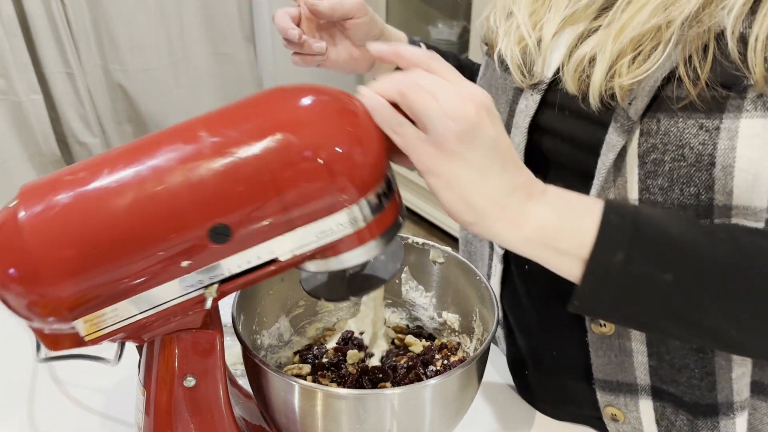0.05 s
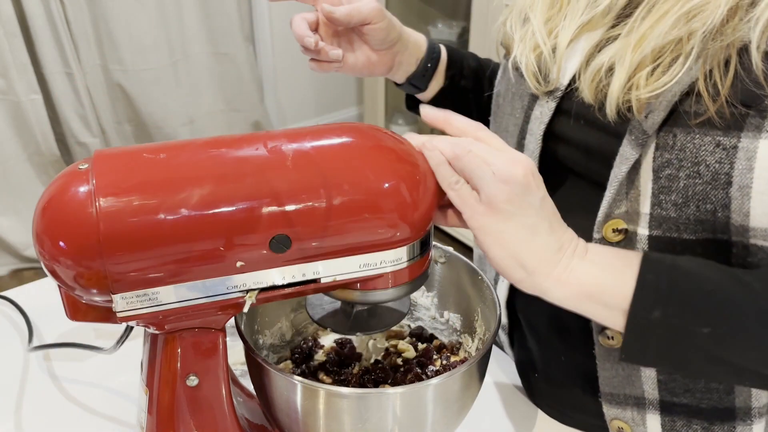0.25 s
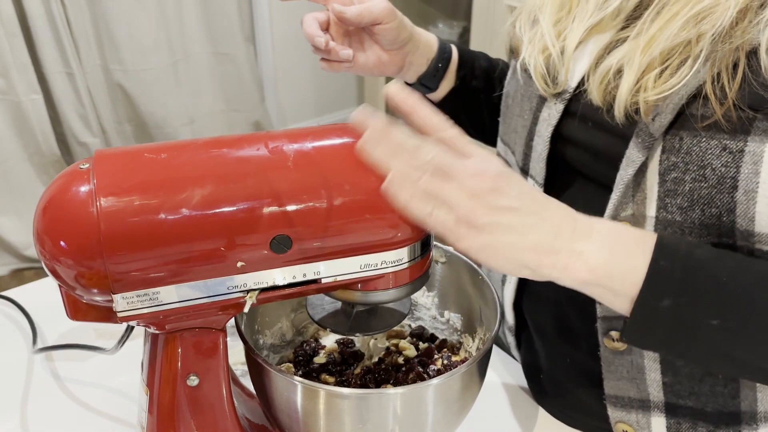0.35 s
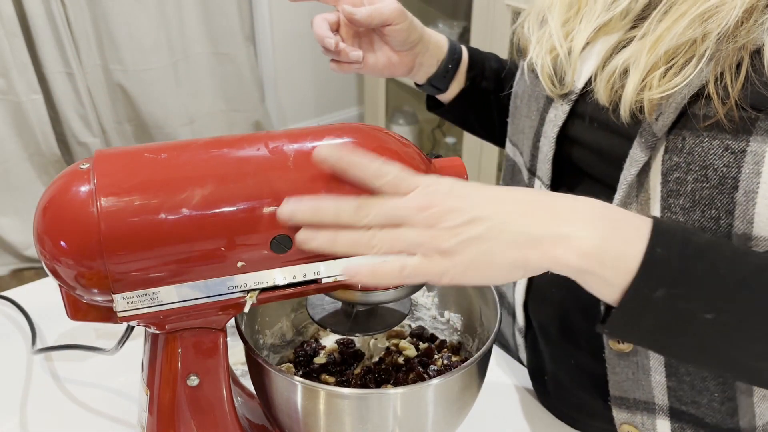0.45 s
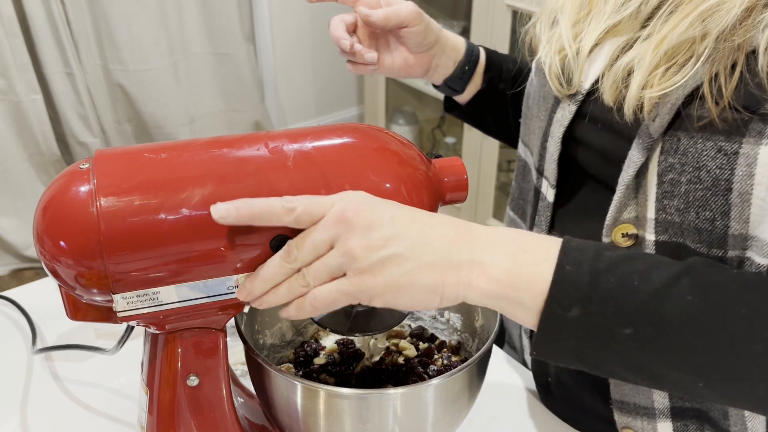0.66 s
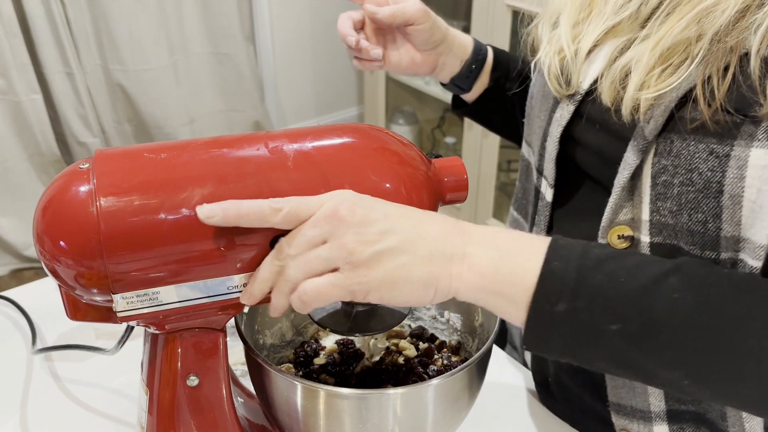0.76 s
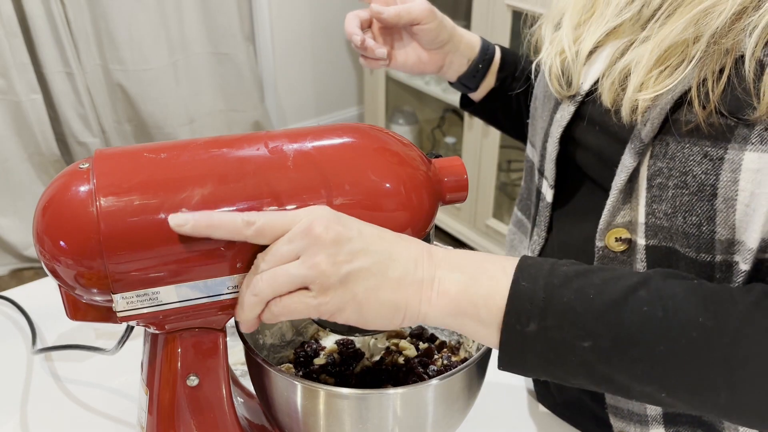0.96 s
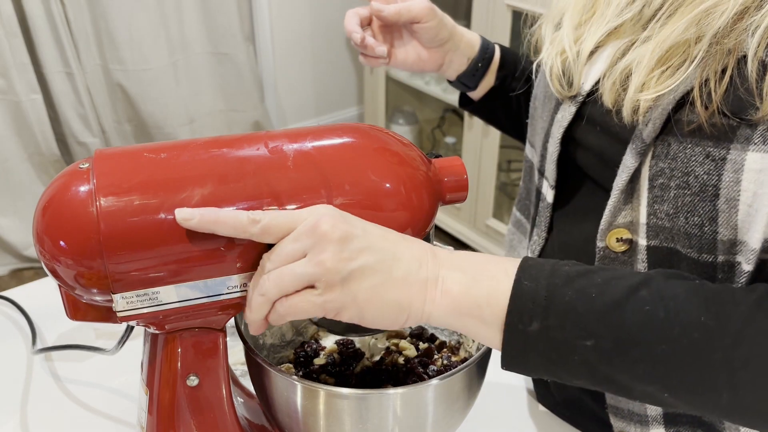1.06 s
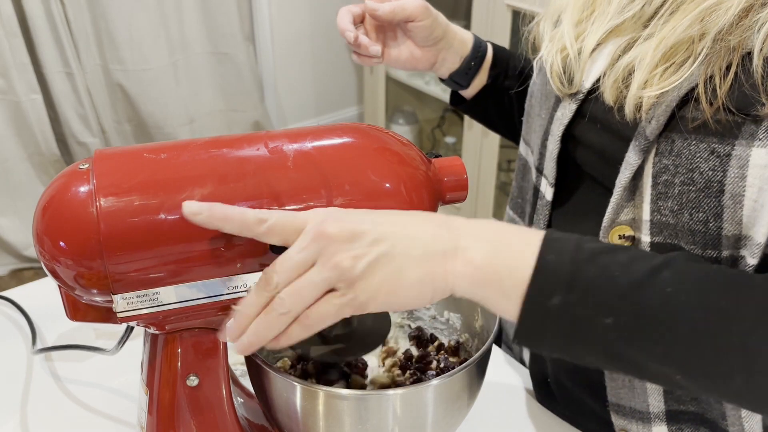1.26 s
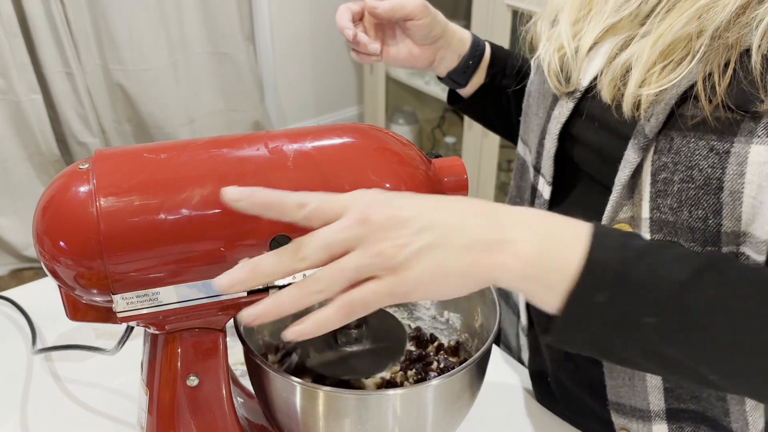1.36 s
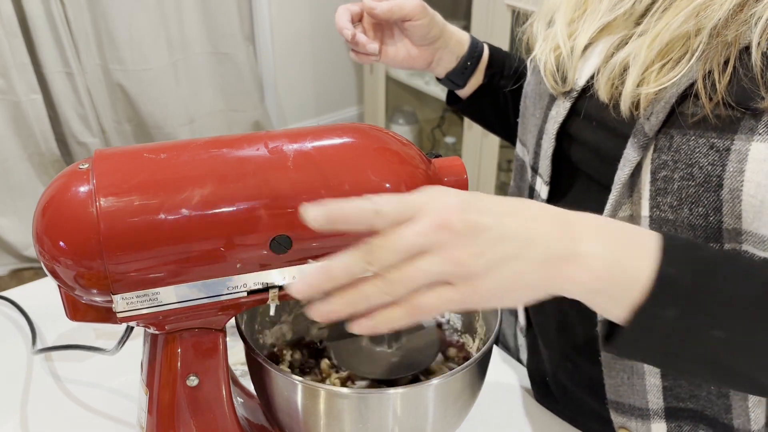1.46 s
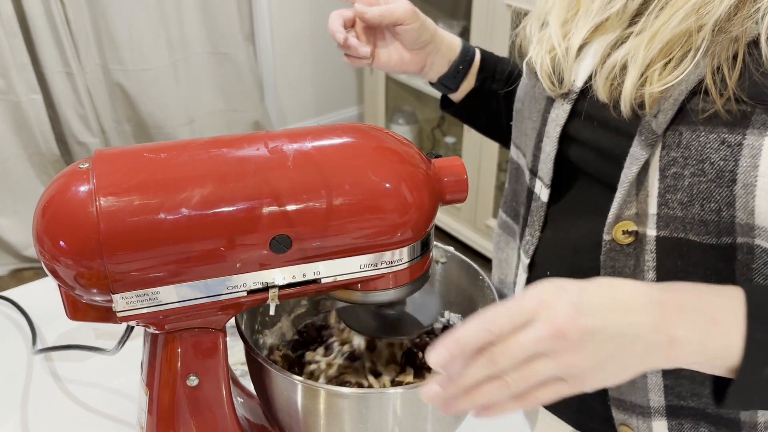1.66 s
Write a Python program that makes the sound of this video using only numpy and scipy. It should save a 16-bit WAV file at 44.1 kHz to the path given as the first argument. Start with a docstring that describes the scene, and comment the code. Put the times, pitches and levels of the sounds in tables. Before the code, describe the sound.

Stand mixer head thuds down with a loose rattle, lever clicks, and the motor whines steadily

```python
"""In a quiet kitchen, the head of a stand mixer drops onto its base with a dull thump and a rattle.
A hand rustles, feels for the lever and clicks it over; then the mains motor runs up.
Knocks and clicks are sums of fading tones; rattle, rustles and hiss are shaped noise.
The motor is a gear whine rippling with the mains, a buzzing casing, brush hiss and a low rumble.
"""
import sys
import numpy as np
from scipy import signal
from scipy.fft import rfft, irfft
from scipy.io import wavfile
from scipy.ndimage import uniform_filter1d

SR = 44100
rng = np.random.default_rng(int(sys.argv[2]) if len(sys.argv) > 2 else 0)


def rack_gain(trim_db):
    """Turn a fader trim in dB into the linear factor to multiply a signal by."""
    fader = np.asarray(trim_db, float)
    return 10 ** (fader / 20)


def inscribe(sig):
    """Save sig as 16-bit PCM at rate SR to the path in sys.argv[1].

    A 1-D sig is mono; a 2-D sig holds one channel per row.
    Samples are clipped to [-1, 1] before scaling.
    """
    pcm = np.round(np.clip(np.atleast_2d(sig).T, -1, 1) * 32767)
    wavfile.write(sys.argv[1], SR, pcm.astype(np.int16))


N = 74970  # length in samples

# room tone, shape of the spectrum: f/Hz, relative density/dB
KITCHEN_SPECTRUM = [(30, -26.5), (90, 4.5), (204, -11), (239, -0.5), (273, -12), (473, -13), (913, -20),
                    (1670, -22), (5040, -30), (16000, -35)]
# wavering appliance hum: f/Hz, width/Hz, level/dB
APPLIANCE_HUM = [(98, 65, -58), (173.8, 20, -61)]
# hand and sleeve rustles: t/s, length/s, level before the swell/dB, centre f/Hz
RUSTLES = [(0.032, 0.05, -60.5, 3500), (0.142, 0.13, -63, 1480), (0.439, 0.023, -64.5, 4800),
           (0.542, 0.035, -66, 10500), (0.575, 0.03, -68.5, 6330), (0.701, 0.026, -62, 3250),
           (0.728, 0.021, -65.5, 6000), (0.827, 0.033, -60, 6300), (0.955, 0.028, -66.5, 5170),
           (1.43, 0.048, -52.5, 12900)]
# head landing and rebounds: t/s, level/dB, contact length/ms, rattle level/dB
BLOWS = [(0.2292, -24, 0.19, -39.5), (0.2335, -15, 0.89, -27.5), (0.2513, -18, 5.53, -33),
         (0.2706, -19.5, 2.82, -37)]
# ringing of mixer body and worktop: f/Hz, level/dB, time to fall 60 dB/s
BODY_MODES = [(46.25, -4, 0.5), (60.74, -20, 0.99), (85.95, -2.5, 0.59), (120.4, -1, 0.56),
              (135, -4.5, 0.44), (191.4, -18, 0.57), (304, -9.5, 0.69), (350, -5.5, 0.21),
              (738, -9.5, 0.056), (930, -27, 0.033), (1006, -17, 0.17), (1577, -26, 0.066),
              (1828, -8.5, 0.076)]
# rattle of loose parts after each blow: f/Hz, level/dB, time to fall 60 dB/s
LOOSE_PARTS = [(323, -3.5, 0.61), (827, -9, 0.28), (1630, -9.5, 0.3), (3490, -12.5, 0.13),
               (6000, -20, 0.058), (9200, -13, 0.063)]
# single knocks and pings (hinge, head meets base, fingertip, lever spring, motor kick):
# t/s, f/Hz, level/dB, time to fall 60 dB/s
TAPS = [(.2295, 1073, -19.5, 0.053), (0.2331, 289, -5.5, 0.054), (1.047, 9480, -37, 0.086),
        (0.753, 444, -41, 0.054), (1.048, 350, -35.5, 0.21), (1.05, 731.4, -36.5, 0.26)]
# clicks: t/s, level/dB, treble tilt/(dB per octave); the first is the bright tick of the head's last rebound,
# the rest are latch, lever and bowl clicks
CLICKS = [(.2722, -42, 7.0), (1.0405, -47, 0), (1.047, -44, 3.0), (1.0535, -31, -6.0), (1.2792, -33, 0),
          (1.291, -29, 0), (1.2928, -32, -5.0), (1.2975, -33, 7.0), (1.3075, -41, 0), (1.3135, -38, -2.0)]
# steel parts that click: f/Hz, level/dB, time to fall 60 dB/s
STEEL_MODES = [(3800, -17, .012), (4700, 0, .01), (5400, -1, .009), (7400, -2, .009), (8100, -3, .011),
               (9500, -17, .02)]
# motor loudness over time: t/s, whine/dB (before a fixed cut), buzz/dB, hiss/dB, rumble/dB
MOTOR_LEVELS = [(1.043, -45, -41.5, -35.5, -63), (1.078, -43, -38, -51.5, -37.5),
                (1.14, -46.5, -41, -54, -56.5), (1.22, -39.5, -45, -49, -52), (1.29, -38.5, -42, -49, -48),
                (1.42, -41, -43.5, -49, -51), (1.509, -39, -44.5, -45.5, -40.5),
                (1.543, -47.5, -44, -47.5, -48), (1.60, -41.5, -46, -46, -43),
                (1.70, -50.5, -39.5, -47, -50)]
# mesh tone and its mains sidebands, ripple steps -2 to +2: level/dB
MESH_DB = [-6, -3, 0, -2, -1]
# octave of the mesh tone, ripple steps -2 to +1: level/dB
OCTAVE_DB = [-12, -6, -9, -13]
# casing resonances that colour the whine: f/Hz, width/Hz, level/dB
WHINE_CASING = [(1422, 124, 2.5), (1609, 60, 6), (1944, 120, 7), (3230, 1500, -15.5)]
# casing resonances that buzz: f/Hz, width/Hz, level/dB
BUZZ_CASING = [(226, 66, -7), (334, 153, -2.5), (610, 79, -3.5), (721, 62, -2.5), (860, 146, -1),
               (1030, 165, -3.5), (1676, 310, -3.5)]
# brush hiss, shape of the spectrum: f/Hz, relative density/dB
HISS_SPECTRUM = [(1200, -10), (2200, -12.5), (3300, -12.5), (5400, -15.5), (10000, -17.5), (12200, -15.5),
                 (15800, -30.5)]
# the stand shakes the worktop: f/Hz, width/Hz, level/dB
RUMBLE = [(56, 52, -10.5), (99.2, 27, -0.3)]
# two microphone ports, how far the left one leads: f/Hz, phase/rad
PORTS = [(60, 0), (700, .8), (2800, 1), (6300, -.8), (7200, -4.8), (8400, -6.1), (9500, -6.5),
         (11700, -9.1), (12800, -9.7), (14500, -12.3), (15900, -12.6)]

KITCHEN_DB = -56
RISE_CYCLES = 0.28  # heavy parts take up the blow slowly
SHUDDER_DB, SHUDDER_RATE = 2.5, 30  # chance level changes of each body tone: dB, times a second
CRACK_DB, CRACK_T60_S = 9, 0.036  # the first instant of each rattle is louder
RUN_UP_START_S, RUN_UP_END_S, EASE = 1.045, 1.455, 1.35
START_HZ, TOP_MESH_HZ, SAG_HZ_PER_S = 780, 1684, 55
SWITCH_S = 0.007  # time the motor takes to fade in
RIPPLE_HZ = 120
WAVER_DB, WAVER_RATE = 3.0, 22  # chance level changes of the whine: dB, times a second
BUZZ_NOISE, PULSE_SCATTER_DB = 1.34, 5.5
GATE = 0.083  # depth of the mains ripple, as a share of the mean
ROOM_T60_S, ROOM_BASS_HZ, ROOM_DB = 0.4, 350, -8
ROOM_WIDTH = 1.86  # unshared part of the tail, in the mids
PAN_DB, WIDE_HZ = 1.5, 1300
MIC_LOW_HZ, TOP_HZ = 33, 15900
LEFT_RIGHT = np.array([[1], [-1]])  # plus on the left, minus on the right


def level(x, db):
    """Scales a sound to an average (rms) level in dB."""
    return x * rack_gain(db) / np.sqrt(np.mean(x ** 2) + 1e-20)


def band(x, hz, width_hz):
    """Two-pole resonance, gain 1 at the centre."""
    return signal.lfilter(*signal.iirpeak(min(hz, .45 * SR), hz / width_hz, fs=SR), x)


def narrow_noise(length, hz, width_hz, db):
    """Noise through the same resonance twice: a wavering, blurred tone."""
    noise = rng.standard_normal(length)
    return level(band(band(noise, hz, width_hz), hz, width_hz), db)


def colour(points):
    """Noise with a spectrum drawn through (f/Hz, dB) points."""
    hz, db = np.array(points).T
    f = np.arange(N // 2 + 1) * SR / N + 1  # the 1 avoids the logarithm of zero
    gain = rack_gain(np.interp(np.log(f), np.log(hz), db, right=-120))
    return irfft(rfft(rng.standard_normal(N)) * gain, N)


def walk(rate):
    """Smooth chance, spread 1, turning about rate times a second."""
    k = int(SR / rate)
    smooth = uniform_filter1d(uniform_filter1d(rng.standard_normal(N), k), k)
    return level(smooth, 0)


def ring(modes, tilt_db=0):
    """A struck object: a sum of fading tones, tilted in dB per octave around 6 kHz."""
    t = np.arange(SR) / SR
    out = np.zeros(SR)
    for hz, db, t60 in modes:
        strength = rack_gain(db + tilt_db * np.log2(hz / 6000))
        out += strength * np.sin(2 * np.pi * hz * t) * rack_gain(-60 * t / t60)
    return out


def add(out, s, x):
    """Lays a sound into the mix, starting at s seconds."""
    i = int(s * SR)
    out[i:i + len(x)] += x[:N - i]


def kitchen():
    """Room tone and appliance hum from filtered noise; the bass is alike left and right."""
    mid = colour(KITCHEN_SPECTRUM)
    side = band(colour(KITCHEN_SPECTRUM), WIDE_HZ, 5500)
    hum = sum(narrow_noise(N, hz, width, db) for hz, width, db in APPLIANCE_HUM)
    drift = rack_gain(walk(0.73))  # about 1 dB up and down
    return hum + level(mid + 0.87 * side * LEFT_RIGHT, KITCHEN_DB) * drift


def rustles():
    """Cloth and skin slide in grains: noise in uneven short steps that swells and fades."""
    out = np.zeros(N)
    for s, length, db, hz in RUSTLES:
        t = np.arange(SR // 5) / SR / length  # time in rustle lengths
        noise = rng.standard_normal(len(t))
        grain_gain = rack_gain(2.6 * rng.standard_normal(len(t) // 60 + 1)).repeat(60)[:len(t)]
        swell = 5 * t * np.exp(1 - 3.16 * t)
        add(out, s - 0.08 * length, level(band(noise * grain_gain, hz, 0.96 * hz), db) * swell)
    return out


def mixer_body():
    """Body and worktop tones that build up over part of a cycle and shudder as they fade."""
    t = np.arange(SR) / SR
    out = np.zeros(SR)
    for mode in BODY_MODES:
        rise = 1 - np.exp(-t * mode[0] / RISE_CYCLES)
        out += ring([mode]) * rise * rack_gain(SHUDDER_DB * walk(SHUDDER_RATE)[:SR])
    return out


def rattle():
    """Loose parts jangle as fading bands of noise, with a crack at the start."""
    t = np.arange(SR) / SR
    shake = np.zeros(SR)
    for hz, db, t60 in LOOSE_PARTS:
        noise = band(band(rng.standard_normal(SR), hz, hz / 2), hz, hz)
        shake += level(noise, db) * rack_gain(-60 * t / t60)
    crack = 1 + rack_gain(CRACK_DB - 60 * t / CRACK_T60_S)
    return shake * rack_gain(0.56 * walk(170.0)[:SR]) * crack


def thump():
    """Each blow pushes the body tones for its contact time and shakes loose parts."""
    out, t = np.zeros(N), np.arange(SR) / SR
    body = mixer_body()
    for s, db, contact_ms, rattle_db in BLOWS:
        push = np.hanning(int(contact_ms * SR / 1000) + 3)
        knock = signal.fftconvolve(body, push / push.sum())[:SR]
        fade_in = np.clip(t * 1000 / contact_ms, 0, 1)
        add(out, s, rack_gain(db) * knock + rack_gain(rattle_db) * rattle() * fade_in)
    return out


def taps():
    """Each knock or ping is one fading tone, pushed for about half its cycle."""
    out = np.zeros(N)
    for s, hz, db, t60 in TAPS:
        push_samples = int(SR / hz / 2) + 3
        push = np.hanning(push_samples) * 2 / push_samples
        add(out, s, signal.fftconvolve(ring([(hz, db, t60)]), push))
    return out


def clicks():
    """A very short scrape of noise rings the steel parts and is also heard directly."""
    out = np.zeros(N)
    for s, db, tilt_db in CLICKS:
        scrape = rng.standard_normal(40) * np.hanning(40) / 4
        steel = ring(STEEL_MODES, tilt_db)[:SR // 8]
        add(out, s, rack_gain(db) * signal.fftconvolve(steel, scrape))
        add(out, s, rack_gain(db + 11) * band(scrape, 8600, 5700))
    return out


def stand_rumble():
    """The stand shakes the worktop, heard as narrow bands of low noise."""
    return sum(narrow_noise(N, hz, width, db) for hz, width, db in RUMBLE)


def gear_whine(t, ripple):
    """Meshing teeth sing a rising tone and its octave, with mains sidebands, through the casing."""
    # the mesh eases up to full speed, then sags under the dough
    left = np.interp(t, (RUN_UP_START_S, RUN_UP_END_S), (1, 0))
    sag = SAG_HZ_PER_S * np.clip(t - RUN_UP_END_S, 0, None)
    hz = TOP_MESH_HZ - (TOP_MESH_HZ - START_HZ) * left ** EASE - sag
    turn = 2 * np.pi * np.cumsum(hz) / SR
    teeth = np.zeros(N)
    for multiple, levels in ((1, MESH_DB), (2, OCTAVE_DB)):
        for k, db in enumerate(levels):
            waver = rack_gain(db + WAVER_DB * walk(WAVER_RATE))
            teeth += waver * np.sin(multiple * turn + (k - 2) * ripple + .3 * walk(30))
    return sum(rack_gain(db) * band(teeth, f, width) for f, width, db in WHINE_CASING) + 0.77 * teeth


def casing_buzz(gate):
    """Uneven current pulses and rippling noise drive the casing resonances."""
    at = (np.arange(int(N / SR * RIPPLE_HZ)) * SR / RIPPLE_HZ).astype(int)
    pulses = np.zeros(N)
    pulses[at] = rack_gain(PULSE_SCATTER_DB * rng.standard_normal(len(at)))
    drive = level(pulses, 0) + BUZZ_NOISE * gate * rng.standard_normal(N)
    # neighbouring resonances have opposite signs
    return sum((-1) ** k * level(band(drive, f, width), db) for k, (f, width, db) in enumerate(BUZZ_CASING))


def brush_hiss(gate):
    """Brushes hiss as coloured noise, rippling with the mains and flickering by chance."""
    return gate * rack_gain(1.05 * walk(27)) * colour(HISS_SPECTRUM)


def motor():
    """Rumble, whine, buzz and hiss share one start, each with its own loudness curve."""
    t = np.arange(N) / SR
    times, *curves = np.array(MOTOR_LEVELS).T
    whine_db, buzz_db, hiss_db, rumble_db = (np.interp(t, times, curve) for curve in curves)
    ripple = 2 * np.pi * RIPPLE_HZ * t
    gate = 1 + GATE * np.cos(ripple)
    mix = rack_gain(rumble_db) * stand_rumble()
    mix += rack_gain(whine_db - 7.5) * gear_whine(t, ripple)
    mix += rack_gain(buzz_db) * level(casing_buzz(gate), 0)
    mix += rack_gain(hiss_db) * level(brush_hiss(gate), 0)
    return mix * np.clip((t - times[0]) / SWITCH_S, 0, 1)


def walls(near):
    """The walls return a short tail of fading noise, partly different left and right."""
    t = np.arange(SR // 2) / SR
    shared, apart = rng.standard_normal((2, len(t)))
    tail = shared + ROOM_WIDTH * band(apart, WIDE_HZ, WIDE_HZ * 2) * LEFT_RIGHT
    tail = tail * rack_gain(-60 * t / ROOM_T60_S) * np.clip(t / 0.0053, 0, 1)
    tail = tail / np.sqrt(np.sum(tail[0] ** 2))
    tail = signal.lfilter(*signal.butter(2, ROOM_BASS_HZ, "high", fs=SR), tail)
    return signal.fftconvolve(near[None], tail, axes=1)[:, :N]


def scene():
    """Near sources lean left in the mids and slightly right elsewhere; room and kitchen join in."""
    near = thump() + clicks() + rustles() + taps() + motor()
    upper = band(near, 1500, 6400)
    lean = LEFT_RIGHT * ((rack_gain(PAN_DB / 2) - 1) * upper - 0.074 * (near - upper))
    return near + lean + rack_gain(ROOM_DB) * walls(near) + kitchen()


def roll_off(x):
    """The treble ends steeply here."""
    return signal.sosfilt(signal.butter(12, 17030, fs=SR, output="sos"), x)


def record(dry):
    """A phone: phase lag between its two ports, deep bass cut and a cut top."""
    lead = np.interp(np.arange(N // 2 + 1) * SR / N, *np.array(PORTS).T)
    x = irfft(rfft(dry) * np.exp(.5j * lead * LEFT_RIGHT), N)
    x = signal.sosfilt(signal.butter(3, MIC_LOW_HZ, "high", fs=SR, output="sos"), x)
    x = signal.sosfilt(signal.ellip(8, 1, 60, TOP_HZ, fs=SR, output="sos"), x)
    return roll_off(x)


dry = scene()
out = record(dry)
inscribe(out)
```